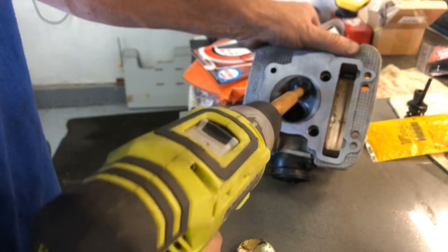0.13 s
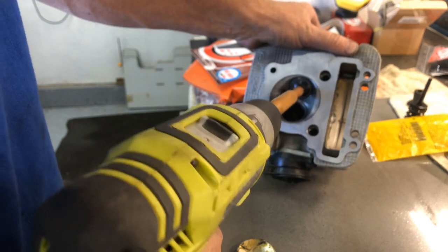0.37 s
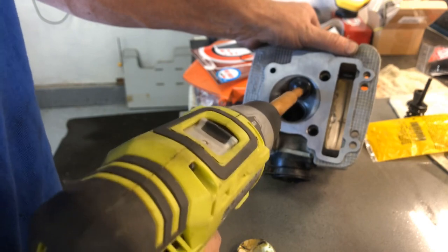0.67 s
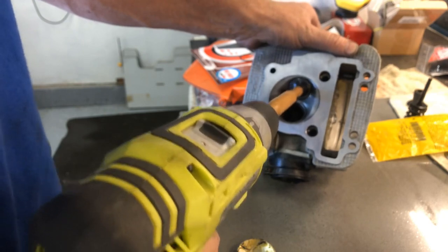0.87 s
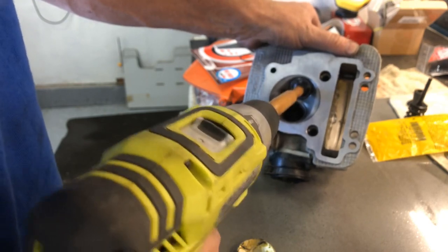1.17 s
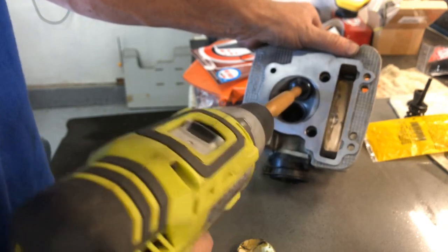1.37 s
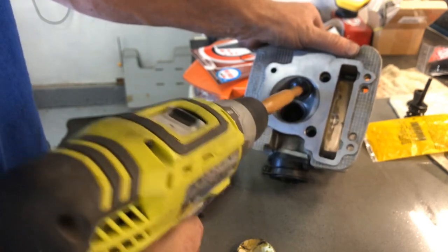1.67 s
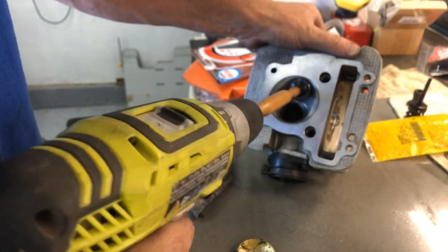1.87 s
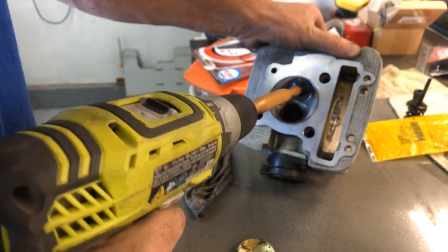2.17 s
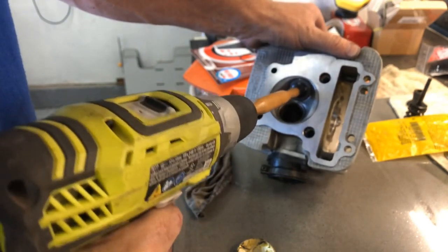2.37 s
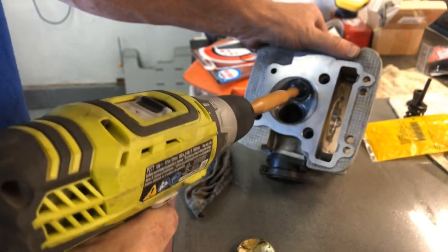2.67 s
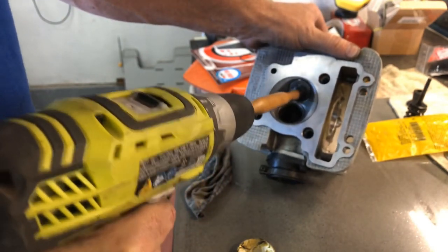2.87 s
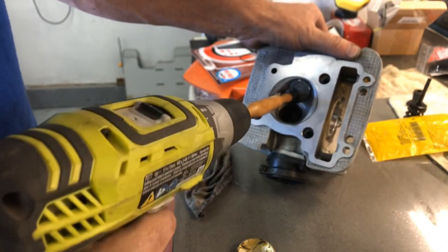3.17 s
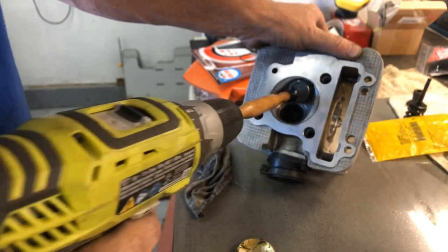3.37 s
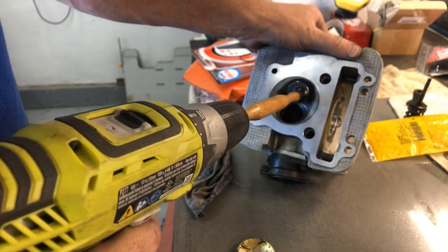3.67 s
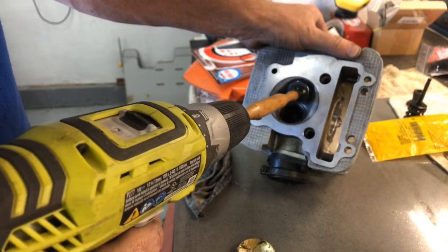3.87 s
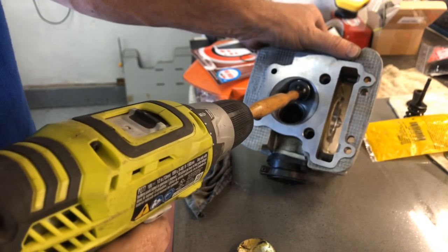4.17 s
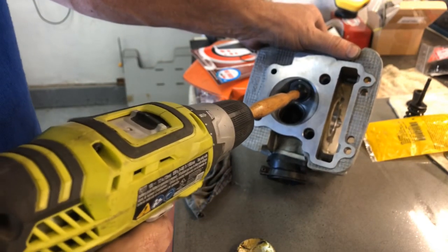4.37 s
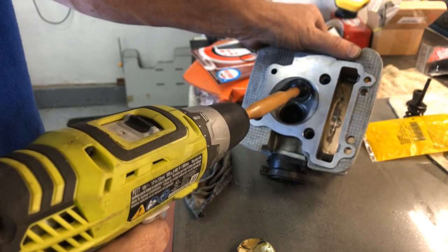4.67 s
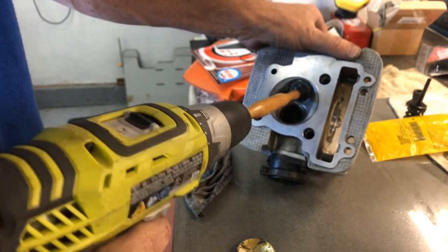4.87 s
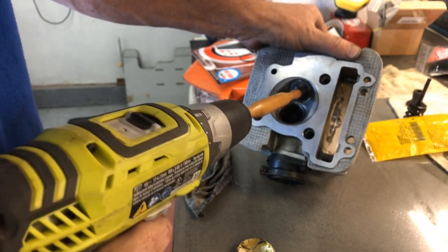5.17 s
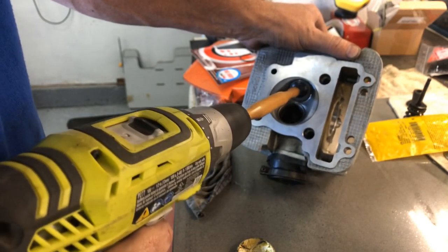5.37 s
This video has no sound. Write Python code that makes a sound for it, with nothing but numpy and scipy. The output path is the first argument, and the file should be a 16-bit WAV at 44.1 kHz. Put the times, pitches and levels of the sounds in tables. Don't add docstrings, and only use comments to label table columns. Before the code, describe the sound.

In a small workshop, close to a mono microphone, a drill spins an engine valve on abrasive paste. Coarse grinding swells and sags with each push, with ringing metal knocks, while a piercing motor whine holds nearly steady. The drill cuts out, the loose valve scrapes faintly and the bench creaks, then a second, duller run starts with a flurry of knocks.

```python
import sys
import numpy as np
from scipy import signal
from scipy.io import wavfile
from scipy.ndimage import uniform_filter1d

SR = 44100
rng = np.random.default_rng(int(sys.argv[2]) if len(sys.argv) > 2 else 0)


def wrap_up_sound(samples):
    columns = np.atleast_2d(samples).T
    tamed = np.clip(columns, -1, 1)
    steps = np.round(tamed * 32767).astype(np.int16)
    wavfile.write(sys.argv[1], SR, steps)


def makeup_ratio(level_db):
    decades = np.asarray(level_db, float) / 20
    return 10 ** decades


N = 243873

# (pulled [s], let go [s])
PULLS = [
    (-.1, 3.22),
    (4.575, 5.53),
]
# (rotor rate [Hz], side line [dB], its change [dB/s],
# unevenness [dB], lower side line re upper [dB])
ROTOR_LINES = [
    (263, -36, 3.5, 4, 2),
    (181, -19, 0, 0, -3),
]
# (time [s], share bedded in [0-1])
BEDDING = [(.7, 0), (1.4, 0.61), (2.1, 0.91), (3.3, 0.6)]
# (time [s], peak level [dB], frequency [Hz], t60 [s])
JOLTS = [
    (0.0949, -29.5, 301, 0.11),
    (0.3003, -16, 336, 0.051),
    (0.817, -52, 318, 0.22),
    (0.973, -28.5, 285, 0.082),
    (1.558, -34.5, 309, 0.13),
    (2.154, -37, 460, 0.089),
    (2.706, -34, 312, 0.034),
    (2.906, -27.5, 387, 0.067),
]


def evened(x):
    return x / np.sqrt(np.mean(x ** 2) + 1e-20)


def add(mix, s, sound):
    part = mix[round(s * SR):][:len(sound)]
    part += sound[:len(part)]


def follow(t, rows):
    return np.interp(t, *np.transpose(rows))


def drift(size, hz):
    lowpass = signal.butter(2, hz, fs=SR, output="sos")
    return evened(signal.sosfilt(lowpass, rng.standard_normal(size)))


def body(colour, modes, bed_db):
    hz = np.fft.rfftfreq(16384, 1 / SR)
    f, db = np.transpose(colour)
    power = makeup_ratio(np.interp(np.log(hz + 1), np.log(f), db) + bed_db) ** 2
    for centre, width, peak_db in modes:
        power = power + makeup_ratio(peak_db) ** 2 / (1 + (2 * (hz - centre) / width) ** 2) ** 2
    log_gain = np.log(power + 1e-12) / 2
    circle = np.concatenate([log_gain, log_gain[-2:0:-1]])
    return np.fft.ifft(np.exp(np.conj(signal.hilbert(circle)))).real[:6000]


def grit(size, per_s, spread_db, hiss):
    chance = rng.random(size)
    big = rng.exponential(1, size)
    noise = rng.standard_normal(size)
    impacts = np.sign(noise) * (chance < per_s / SR) * makeup_ratio(spread_db * np.minimum(big, 5))
    return evened(impacts) + hiss * noise


def shaken(force, response, lo_hz, hi_hz):
    x = signal.oaconvolve(force, response)[:len(force)]
    bandpass = signal.butter(4, [lo_hz, hi_hz], "band", fs=SR, output="sos")
    return x / np.sqrt(np.mean(signal.sosfilt(bandpass, x) ** 2))


def turned(force, colour, modes, later_modes, bed_db, band_hz, share):
    first = shaken(force, body(colour, modes, bed_db), *band_hz)
    second = shaken(force[::-1], body(colour, later_modes, bed_db), *band_hz)
    return np.sqrt(1 - share) * first + np.sqrt(share) * second


def resonate(x, hz, width):
    turn = np.exp(2j * np.pi * np.cumsum(hz) / SR)
    r = np.exp(-np.pi * width / SR)
    low = signal.lfilter([(1 - r) ** 2], [1, -2 * r, r * r], x / turn)
    return 2 * (turn * low).real


def swayed(x, depth_db, size=40):
    z = signal.stft(x, nperseg=512)[2]
    treble = np.linspace(0, 1, len(z))[:, None] ** 0.21
    patches = uniform_filter1d(rng.standard_normal(z.shape), 4, 0)
    patches = uniform_filter1d(patches, size, 1)
    z = z * makeup_ratio(depth_db * treble * evened(patches))
    return signal.istft(z, nperseg=512)[1][:len(x)]


def steadied(x):
    swell_s, levelled_share = 0.018, 0.54
    swell = np.sqrt(abs(uniform_filter1d(x ** 2, size=round(swell_s * SR))) + 1e-3)
    return evened(x / swell ** levelled_share) * np.sqrt(np.mean(x ** 2))


def fades(t, k):
    start = t - t[0] + (k == 0)
    end = t[-1] - t + k
    return np.minimum(1, np.minimum(start, end) / 0.011)


def blow(db, hz, t60, pair, rise):
    t = np.arange(round(t60 * SR)) / SR
    ring = np.sin(2 * np.pi * hz * t) + 0.26 * np.sin(2 * np.pi * hz * pair * t)
    contact = uniform_filter1d(rng.standard_normal(4000), size=7)
    edge = 0.41 * contact * np.exp(-np.arange(4000) / SR / 0.004)
    ring[:4000] += edge[:len(ring)]
    return makeup_ratio(db - 60 * t / t60) * ring * (1 - np.exp(-t / rise))


def room():
    # (frequency [Hz], level [dB per Hz])
    air_colour = [(24, -66), (40, -19), (60, -9), (202, -13), (253, -10), (287, -9.5), (397, -15),
                  (548, -16.5), (606, -16.5), (1600, -27), (6000, -29.5), (8500, -37), (15500, -41)]
    air = evened(signal.oaconvolve(rng.standard_normal(N), body(air_colour, [], 0))[:N])
    return makeup_ratio(-67 + 1 + .45 * drift(N, 6)) * air


def pressing(t, bench):
    # (time [s], length [s], level [dB], sag [dB/s], passed on to the bench [dB])
    pushes = [
        (0.043, 0.068, -46, -5, -14),
        (0.261, 0.4, -37.5, -6.5, -9),
        (0.962, 0.3, -34.5, -15.5, -10.5),
        (1.557, 0.3, -33.5, -29, -11.5),
        (2.142, 0.35, -34, -15.5, -12.5),
        (2.698, 0.21, -36.5, -16, -9),
        (2.948, 0.38, -42, -9, -7.5),
        (4.607, 0.25, -42.5, -5, -8.5),
        (4.882, 0.58, -42, -1.5, -14.5),
    ]
    press_s, lift_db_per_s = 0.017, -160
    landing_db, landing_s = -2, 0.045
    total = 0
    for s, length, db, sag_db, bench_db in pushes:
        push_db = db + bench * bench_db + sag_db * (t - s)
        push_db = push_db + landing_db * np.exp(-abs(t - s) / landing_s)
        push_db = push_db + lift_db_per_s * np.maximum(t - s - length, 0)
        total = total + np.clip((t - s) / press_s, 0, 1) * makeup_ratio(push_db)
    return total


def drive(k):
    # (level at the start [dB], change as the drill swings [dB/s])
    gear_levels = [
        (-46, -1.11),
        (-55, 3),
    ]
    brush_levels = [
        (-56.5, -0.5),
        (-67, 4),
    ]
    shake_levels = [
        (-55, 0),
        (-61.5, 0),
    ]
    spin_up_s, run_down_s, run_down_db, run_out_s = 0.032, 0.09, -23, .17
    surge_peak_db, surge_s = 9.5, 0.18
    lifted_db, bedded_drag_db = -65.5, 21
    spark_db, spark_s = -66, 0.011
    on, off = PULLS[k]
    t = np.arange(max(on, 0), off + run_out_s, 1 / SR)
    run_down = makeup_ratio(run_down_db * (np.maximum(t - off, 0) / run_down_s) ** 2)
    speed = np.minimum((t - on) / spin_up_s, 1) ** 2 * run_down
    surge_db = surge_peak_db * np.exp(-(t - on) / surge_s) * (k == 0)
    gears, brushes, shake = (makeup_ratio(db + slope_db * (t - on)) for db, slope_db in
                             (gear_levels[k], brush_levels[k], shake_levels[k]))
    push = pressing(t, False)
    lifted = makeup_ratio(lifted_db + bedded_drag_db * follow(t, BEDDING))
    load = push / (push + 2 * lifted)
    jolts = 0
    for s, db, *_ in JOLTS:
        jolts = jolts + (t > s) * makeup_ratio(db - 21.5 - 60 * np.maximum(t - s, 0) / 0.38)
    gear_gain = np.hypot(gears * makeup_ratio(0.64 * surge_db), makeup_ratio(-19) * push)
    seat_gain = np.hypot(push, lifted)
    bench_gain = np.hypot(shake * makeup_ratio(1.46 * surge_db), pressing(t, True) + jolts)
    brush_gain = brushes * makeup_ratio(0.95 * surge_db - 1.5 * load) * np.sqrt(speed)
    brush_gain = brush_gain + makeup_ratio(spark_db) * np.exp(-(t - on) / spark_s) / np.maximum(speed, .05)
    return t, speed * np.array([gear_gain, seat_gain, bench_gain, brush_gain])


def casing_rattle(t, k, catch, beat):
    # (frequency [Hz], level [dB per Hz])
    casing_colour = [
        [(24, -42), (40, -16.5), (235, -18.5), (333, -7.5), (664, -10.5), (1240, -3), (1610, -18), (1830, -11),
         (3290, -11), (3580, -9.5), (7000, -19), (9100, -33.5), (15400, -120)],
        [(24, -73), (40, -49), (257, -17), (404, -11), (460, -15), (650, -29), (1000, -15), (1220, -4),
         (1510, -25), (2540, -11.5), (7000, -32), (9100, -71), (15400, -120)],
    ]
    # (frequency [Hz], width [Hz], level [dB])
    casing_modes = [
        [(843, 170, -2.5), (1240, 19, 4), (1870, 27, -13), (2580, 410, -10.5), (3570, 53, 0), (5035, 160, -6),
         (5500, 70, -6.5), (7000, 48, -35.5)],
        [(1825, 89, -3.5), (1948, 29, -0.5), (2520, 290, -6), (3530, 100, -7.5), (3850, 92, -5.5),
         (4100, 76, -8.5), (5010, 170, -9.5), (5250, 200, -11), (5880, 310, -12.5)],
    ]
    # (frequency [Hz], width [Hz], level [dB])
    other_face = [(856, 190, -1), (1240, 22, -2), (1870, 61, 0), (2380, 110, -5.5), (2510, 380, -6),
                  (2940, 130, -5.5), (3580, 85, -5.5), (4560, 33, -19), (5060, 100, -3.5), (5800, 180, -10)]
    # (time [s], share turned [0-1])
    turning = [(.3, 0.05), (1.3, 0.34), (2.2, 0.75), (2.9, 0.83)]
    swing = follow(t, turning).clip(0, 1) * (k == 0)
    gears = grit(len(t), 6000, 1.6, 0.97) * makeup_ratio(0.085 * catch) * (1 + 0.12 * beat)
    rattle = turned(gears, casing_colour[k], casing_modes[k], other_face, 0.98, (2160, 8600), swing)
    return makeup_ratio(-1.12) * swayed(rattle, 1.4, 8)


def seat_grinding(t, k, catch, chatter):
    # (frequency [Hz], level [dB per Hz])
    head_colour = [
        [(350, -54), (600, -14.5), (1290, -4), (1680, -14.5), (2020, -12), (3220, -23), (3930, -22),
         (6250, -43), (7640, -27.5), (12000, -34), (15600, -74), (22000, -120)],
        [(350, -61), (600, -26.5), (991, -9), (1230, -7.5), (1500, -13.5), (2570, -20), (7000, -31),
         (7450, -32), (7930, -37), (12000, -35.5), (15600, -70), (22000, -120)],
    ]
    # (frequency [Hz], width [Hz], level [dB])
    head_modes = [
        [(1126, 32, 1), (1224, 47, -13), (1356, 52, -3), (1454, 53, -1.5), (1563, 33, -11), (1994, 45, -11.5),
         (2050, 36, -15), (2380, 39, -23), (3590, 43, -19), (3870, 42, -7.5)],
        [(866, 170, -16.5), (1098, 53, -10), (1230, 81, -3.5), (1386, 25, -8.5)],
    ]
    # (frequency [Hz], width [Hz], level [dB])
    bedded_modes = [(934, 42, -6), (1120, 43, -3), (1250, 107, 0.5), (1320, 120, -3), (1416, 110, -6.5),
                    (1838, 57, -8.5), (2513, 110, -13.5), (3600, 52, -17), (3863, 32, -10)]
    bedded = follow(t, BEDDING).clip(0, 1) * (k == 0)
    seat = grit(len(t), 1800, 1.65, 0.55) * makeup_ratio(1.1 * catch + 0.5 * chatter - 1.5)
    fresh = shaken(seat, body(head_colour[k], head_modes[k], -7.0), 680, 1800)
    worn = shaken(seat[::-1], body(head_colour[k], bedded_modes, -3.0), 780, 2300)
    return makeup_ratio(-2.5) * steadied(np.sqrt(1 - bedded) * fresh + np.sqrt(bedded) * worn)


def bench_shaking(t, k, catch):
    # (frequency [Hz], level [dB per Hz])
    bench_colour = [
        [(18, -54), (30, -45), (59, -7.5), (226, -8.5), (328, 2.5), (474, -9.5), (640, 0.5), (707, -10),
         (900, 0.5), (1170, -31), (1980, -120)],
        [(18, -64), (30, -37), (98, -15.5), (257, -14.5), (323, 1), (468, -32), (532, 4.5), (622, -14),
         (900, -5.5), (1170, -19), (1980, -120)],
    ]
    # (frequency [Hz], width [Hz], level [dB])
    bench_modes = [
        [(333, 180, -5.5), (417, 53, 2), (523.5, 55, -0.5), (651, 44, -4.5)],
        [(331, 63, -6.5), (407.5, 47, -1.5), (510, 27, -7.5)],
    ]
    force = grit(len(t), 600, 2.96, 1.0) * makeup_ratio(1.0 * catch)
    return makeup_ratio(-1.5) * shaken(force, body(bench_colour[k], bench_modes[k], -6.5), 270, 750)


def brush_hiss(t, k, beat):
    # (frequency [Hz], level [dB per Hz])
    brush_colour = [
        [(3530, -26), (6000, -25), (7640, -1.5), (8340, -10), (14000, -11), (15500, -17)],
        [(3530, -29), (6000, -5.5), (7610, -3), (7920, -4), (9700, -22), (14300, -10), (15500, -14)],
    ]
    # (frequency [Hz], width [Hz], level [dB])
    brush_modes = [
        [(8700, 200, -8), (10700, 230, -4.5), (12400, 200, -16), (12900, 280, -3)],
        [(8650, 250, -4), (9200, 74, -15), (10860, 300, -6), (11100, 400, -6), (12650, 600, -8),
         (13700, 400, -13)],
    ]
    # (frequency [Hz], width [Hz], level [dB])
    other_side = [(9350, 130, -16), (10700, 400, -9), (11800, 250, -11), (12700, 300, -8)]
    # (time [s], share turned [0-1])
    brush_turning = [(.05, .02), (.35, 0.64), (1.0, .95)]
    swing = follow(t, brush_turning).clip(0, 1) * (k == 0)
    force = grit(len(t), 7400, 1.7, 1.6)
    hiss = turned(force, brush_colour[k], brush_modes[k], other_side, -0.5, (7500, 14400), swing)
    return makeup_ratio(-1.5) * swayed(hiss, 1.4) * (1 + 0.18 * beat)


def port_and_bench_notes(t, k, gear_gain, seat_gain):
    # (time [s], port note [Hz], bench hum [Hz])
    rocking = [
        [(0, 1240, 360), (.12, 1262, 333), (.3, 1255, 347), (.71, 1255, 343), (.95, 1257, 331),
         (1.78, 1244, 337), (2.11, 1240, 326.5), (3.13, 1254, 344), (3.36, 1224, 360)],
        [(4.575, 1250, 353), (4.757, 1224, 364), (4.9, 1258, 343), (5.061, 1219, 370), (5.183, 1240, 345),
         (5.283, 1222, 383), (5.425, 1203, 359), (5.477, 1240, 389), (5.53, 1285, 349)],
    ]
    # (port on the gears [dB], port on the seat [dB], port width [Hz],
    # bench hum on the gears [dB], hum width [Hz])
    note_levels = [
        (-9, -13.5, 47, -9.5, 26),
        (-13, -5, 37, -8, 29),
    ]
    linger_s = 0.023
    s, port_hz, bench_hz = np.transpose(rocking[k])
    gears_db, seat_db, port_width, bench_db, bench_width = note_levels[k]
    rub = grit(len(t), 2500, 2.9, 1.0)
    decay = np.exp(-1 / (linger_s * SR))
    feed = np.hypot(makeup_ratio(gears_db) * gear_gain, makeup_ratio(seat_db) * seat_gain)
    feed = np.maximum(feed, signal.lfilter([1 - decay], [1, -decay], feed))
    port = steadied(evened(resonate(rub, np.interp(t, s, port_hz), port_width)))
    hum = evened(resonate(rub, np.interp(t, s, bench_hz), bench_width))
    return feed * port + makeup_ratio(bench_db) * gear_gain * hum


def drill(k):
    t, (gear_gain, seat_gain, bench_gain, brush_gain) = drive(k)
    n = len(t)
    catch = drift(n, 17.0)
    chatter = drift(n, 110)
    rotor_hz = ROTOR_LINES[k][0] * (1 + 0.0199 * drift(n, 4.13))
    beat = np.cos(2 * np.pi * np.cumsum(rotor_hz) / SR)
    out = gear_gain * casing_rattle(t, k, catch, beat)
    out += seat_gain * seat_grinding(t, k, catch, chatter)
    out += bench_gain * bench_shaking(t, k, catch)
    out += brush_gain * brush_hiss(t, k, beat)
    out += port_and_bench_notes(t, k, gear_gain, seat_gain) * makeup_ratio(1.0 * chatter - 1.1)
    return t[0], swayed(out, 2.27) * fades(t, k)


def whine(k):
    # (time [s], switching frequency [Hz])
    switching = [(0, 7385), (.22, 7405), (.4, 7390), (.65, 7382), (.9, 7395), (1.15, 7378), (1.4, 7392),
                 (1.75, 7382), (2.05, 7392), (2.45, 7376), (2.7, 7390), (3.0, 7380), (3.19, 7380),
                 (3.225, 7270), (4.56, 7620), (4.6, 7270), (4.66, 7348), (4.8, 7362), (5.53, 7372)]
    # (time [s], detour beyond whole waves [mm])
    detour = [
        [(0, 18), (.4, 21.5), (.62, 26), (.7, 40), (.8, 19), (.87, 56), (1.15, 28.5), (1.23, 29), (1.27, 40),
         (1.34, 44.5), (2.06, 29.7), (2.29, 59), (2.38, 20), (2.68, 38.5), (3.215, 28)],
        [(4.56, 76), (4.83, 25), (5.24, 51), (5.53, 39)],
    ]
    # (whine [dB], octave [dB], bounce share, octave bounce share, octave offset [waves])
    singing = [
        (-54.5, -63.5, 0.62, 0.41, 0.87),
        (-66.5, -70, 0.33, .4, 0.68),
    ]
    wave_mm = 46.4
    s, detour_mm = np.transpose(detour[k])
    t = np.arange(s[0], s[-1], 1 / SR)
    n = len(t)
    late = np.exp(2j * np.pi * np.interp(t, s, detour_mm) / wave_mm)
    first_db, octave_db, bounce, octave_bounce, offset = singing[k]
    rotor_hz, side_db, slope_db, uneven_db, lower_db = ROTOR_LINES[k]
    side_db = side_db + slope_db * (t - t[0])
    turn = 2 * np.pi * np.cumsum(follow(t, switching) + 1.5 * drift(n, 6)) / SR
    rotor = 2 * np.pi * np.cumsum(rotor_hz * (1 + 0.0253 * drift(n, 2.9))) / SR
    above = makeup_ratio(side_db + (2.2 + 0.31 * uneven_db) * drift(n, 3.5))
    below = makeup_ratio(side_db + lower_db + (2.2 + .3 * uneven_db) * drift(n, 3.5))
    depth = above * np.exp(1j * rotor) + below * np.exp(-1j * rotor)
    depth = depth * np.clip((t - PULLS[k][0] - .04) / .14, 0, 1)
    first = makeup_ratio(first_db) * abs(1 + bounce * late)
    first = first * ((1 + depth) * np.exp(1j * turn)).imag
    octave_late = late ** 2 * np.exp(2j * np.pi * offset)
    octave = makeup_ratio(octave_db + 1.3 * drift(n, 4.5)) * abs(1 + octave_bounce * octave_late)
    octave = octave * ((1 + 4.0 * depth) * np.exp(2j * turn)).imag
    return t[0], np.sqrt(2) * (first + octave) * fades(t, k)


def add_catches(mix):
    # (time [s], peak level [dB], ring frequency [Hz])
    caught_grains = [(0.0801, -38, 1280), (0.1096, -31, 1320), (0.2765, -27, 1346), (0.321, -34, 1124),
                     (0.448, -24, 1355), (0.5402, -28, 1240), (0.589, -34, 1320), (0.644, -38, 1240),
                     (0.6988, -32, 1450), (0.9197, -42, 1270), (1.038, -26, 1460), (1.098, -34, 1250),
                     (1.238, -25, 1340), (1.598, -24, 1320), (1.6272, -24.5, 1373), (1.7445, -23, 1290),
                     (1.9769, -32, 1210), (2.1455, -29, 1240), (2.188, -23, 1140), (2.3987, -37, 1290),
                     (2.4186, -31, 1370), (2.521, -31, 1236), (2.6502, -32, 1255), (2.6784, -31.5, 1200),
                     (2.7908, -22.5, 1300), (2.854, -35, 1110), (2.9337, -34, 1240), (2.9686, -31, 1230),
                     (3.145, -29, 1250), (3.16, -29, 1240), (3.2331, -29, 1214), (3.5174, -57, 1460),
                     (4.6418, -39, 1170), (4.6668, -34, 1320), (4.8122, -32, 1261), (4.8783, -32, 1260),
                     (4.8974, -31, 1280), (4.9376, -33, 1240), (4.9785, -35, 1300), (5.0968, -38, 1200),
                     (5.1223, -41, 1280), (5.16, -42, 1240), (5.18, -28, 1240), (5.38, -29, 1224),
                     (5.4248, -29, 1236), (5.4715, -43, 1260),
                     (2.2096, -23, 1240), (2.296, -31, 1300), (2.303, -25.5, 1250), (2.368, -31, 1240),
                  (2.759, -22.5, 1277), (2.873, -30, 1240), (2.952, -33, 1240), (2.985, -28, 1250),
                  (3.084, -37, 1240), (4.75, -25, 1200), (4.775, -33, 1240), (4.921, -33, 1250),
                  (4.946, -28, 1260), (5.132, -28, 1204), (5.208, -34, 1240), (5.222, -33, 1240),
                  (5.277, -27.5, 1230), (5.337, -27.5, 1240), (5.437, -27.5, 1233), (5.482, -30.5, 1273),
                  (5.06, -31, 1210), (5.259, -32, 1230)]
    for s, db, hz in caught_grains:
        add(mix, s - .0007, blow(db + 2, hz, 0.031, 1.09, .0035))


def add_thumps(mix):
    for s, db, hz, t60 in JOLTS:
        add(mix, s, blow(db - 5.5, hz, t60, 0.434, 0.0018))
        add(mix, s + 0.008, blow(db - 17.5, 0.553 * hz, 0.84 * t60, 0.39, 0.0074))
        add(mix, s, blow(db - 10.5, 1.6 * hz, 0.97 * t60, 1.0, 0.0025))


def add_ticks(mix):
    # (time [s], level [dB], centre frequency [Hz], t60 [s])
    stem_ticks = [
        (0.9722, -47, 9300, 0.04),
        (1.5683, -44, 9500, 0.04),
        (2.1594, -55, 9000, 0.03),
        (2.9876, -44, 7950, 0.03),
    ]
    for s, db, hz, t60 in stem_ticks:
        t = np.arange(round(t60 * SR)) / SR
        spit = resonate(rng.standard_normal(4000)[:len(t)], hz + 0 * t, 2600)
        add(mix, s, makeup_ratio(db - 60 * t / t60) * evened(spit) * (1 - np.exp(-t / .0015)))


def add_shoves(mix):
    # (time [s], peak level [dB], frequency [Hz])
    bench_shoves = [
        (.975, -45, 114),
        (1.575, -43.5, 72),
        (1.4, -45, 130),
    ]
    for s, db, hz in bench_shoves:
        add(mix, s, blow(db, hz, .16, 1.69, .012))


def add_knocks(mix):
    # (time [s], peak level [dB], ring frequency [Hz], t60 [s])
    seat_knocks = [(0.979, -23, 1320, 0.053), (0.99, -17, 1290, 0.066), (1.166, -16, 1290, 0.067),
                   (1.5571, -21, 1160, 0.12), (1.7256, -18, 1310, 0.053), (1.856, -21.5, 1280, 0.06),
                   (2.1607, -5.5, 1236, 0.046), (2.1686, -14, 1250, .05), (2.2826, -11, 1295, 0.06),
                   (2.327, -18, 1300, 0.06), (2.465, -19, 1240, 0.062), (2.708, -18, 1240, 0.077),
                   (2.748, -17, 1234, 0.063), (2.8148, -7, 1240, 0.045), (4.1542, -55, 1250, 0.06),
                   (4.2752, -67, 1040, 0.06), (4.432, -35.5, 1270, 0.054), (4.5537, -43, 1250, 0.045),
                   (4.587, -41, 1160, 0.04), (4.599, -30, 2550, 0.037), (4.6065, -36, 2650, .03),
                   (4.618, -25, 1230, .05), (4.659, -22, 1150, .04), (4.607, -22.5, 1195, 0.058),
                   (4.6833, -17, 1290, 0.062), (4.7212, -18, 1164, 0.063), (4.738, -17, 1180, 0.058),
                   (4.839, -21, 1240, 0.031), (4.9096, -24, 1294, 0.1), (4.996, -19.5, 1280, 0.067),
                   (5.048, -22, 1200, 0.084), (5.244, -24, 1240, 0.1), (5.4117, -35, 1240, 0.035)]
    lead_s, rise_s = 0.001417, 0.0032
    for s, db, hz, t60 in seat_knocks:
        add(mix, s - lead_s, blow(db - 4, hz, 0.41 * t60, 1.12, rise_s))


def strokes(t, rows):
    total = 0
    for s, length, db, *_ in rows:
        arch = np.sin(np.pi * np.clip((t - s) / length, 0, 1) ** 0.72) ** 1.5
        total = total + makeup_ratio(db) * arch
    return total


def pause():
    # (time [s], length [s], level [dB], from [Hz], to [Hz])
    drags = [
        (3.314, 0.18, -58, 4400, 3300),
        (3.444, 0.25, -75, 3700, 4300),
        (3.61, 0.19, -73, 4200, 3350),
        (3.72, 0.21, -77, 4500, 3760),
        (4.102, 0.14, -86, 5200, 4300),
        (4.189, 0.17, -76, 3520, 3400),
        (4.32, 0.07, -76, 3905, 3900),
        (4.365, 0.19, -80, 3850, 3530),
    ]
    # (time [s], length [s], level [dB])
    shifts = [
        (3.283, 0.097, -57),
        (3.46, 0.14, -65),
        (3.588, .12, -66),
        (3.747, 0.26, -73),
        (3.95, 0.16, -68),
        (4.093, 0.15, -61),
        (4.412, 0.092, -65),
    ]
    # (frequency [Hz], width [Hz], level [dB])
    valve_modes = [(3270, 230, 1), (3530, 120, 4), (3884, 70, 4), (4230, 110, 0), (4600, 150, 3),
                   (4830, 100, 0), (5120, 120, 2)]
    # (frequency [Hz], width [Hz], level [dB])
    creak_modes = [(210, 32, -13), (306, 26, 4.5), (385, 46, -2.5), (530, 21, -18)]
    t = np.arange(drags[0][0], PULLS[1][0], 1 / SR)
    glide = []
    for s, length, _, from_hz, to_hz in drags:
        glide += [(s + 0.067 * length, from_hz), (s + .8 * length, to_hz)]
    rub = resonate(grit(len(t), 700, 2.6, 0.72), follow(t, glide), 1100)
    valve = body([(100, -19), (9000, -12)], valve_modes, 3.7)
    scrape = swayed(shaken(rub, valve, 2600, 6100), 3.0)
    bench = body([(100, -18), (600, -24), (1500, -47)], creak_modes, 0)
    creak = shaken(grit(len(t), 300, 3.2, 0.83), bench, 200, 450)
    out = np.zeros(N)
    add(out, t[0], (strokes(t, drags) + makeup_ratio(-84)) * scrape + makeup_ratio(-3.5) * strokes(t, shifts) * creak)
    return out


def scene():
    mix = room()
    for k in range(2):
        add(mix, *drill(k))
        add(mix, *whine(k))
    add_catches(mix)
    add_thumps(mix)
    add_ticks(mix)
    add_shoves(mix)
    add_knocks(mix)
    mix += pause()
    return np.array([mix, mix])


def top_cut(x):
    return signal.sosfilt(signal.butter(12, 15720, fs=SR, output="sos"), x)


def record(dry):
    thin = signal.sosfilt(signal.butter(2, 45, "high", fs=SR, output="sos"), dry)
    return top_cut(thin)


dry = scene()
out = record(dry)
wrap_up_sound(out)
```